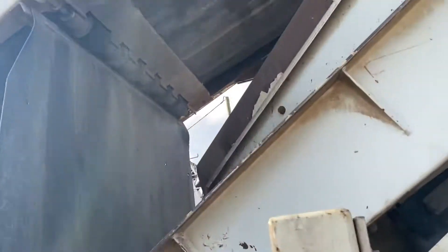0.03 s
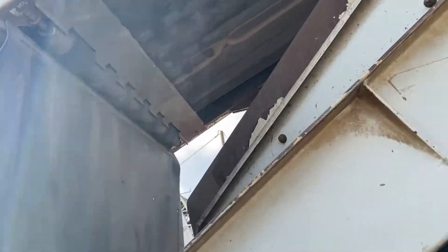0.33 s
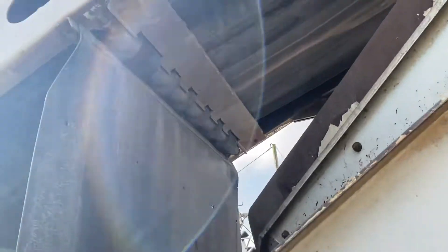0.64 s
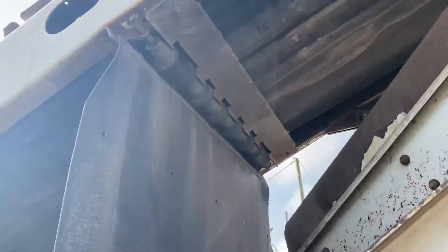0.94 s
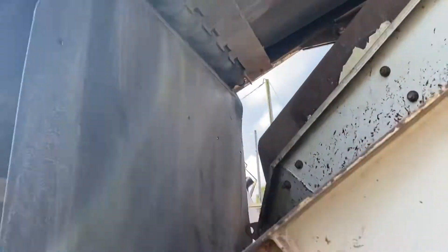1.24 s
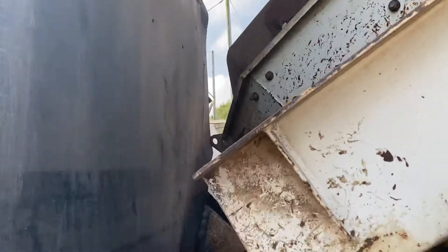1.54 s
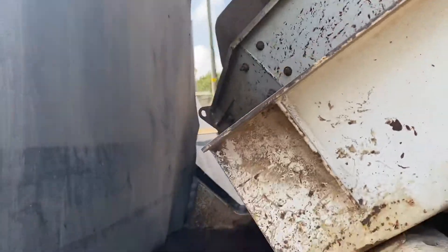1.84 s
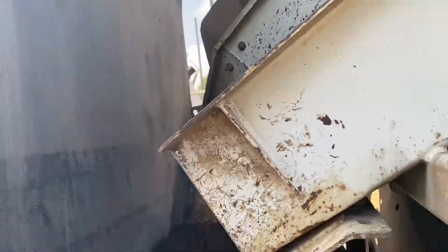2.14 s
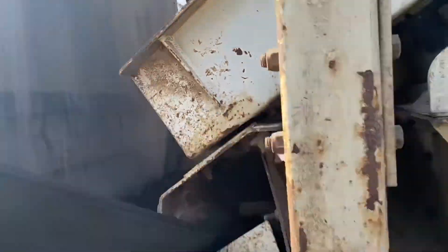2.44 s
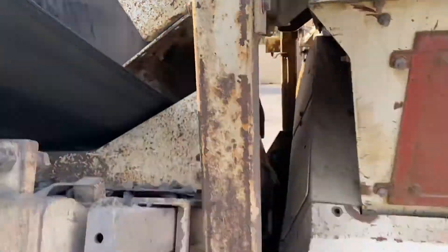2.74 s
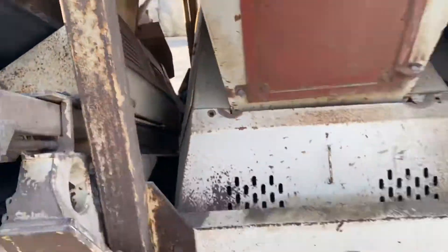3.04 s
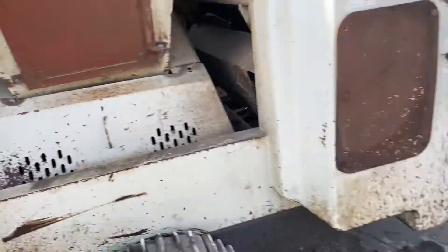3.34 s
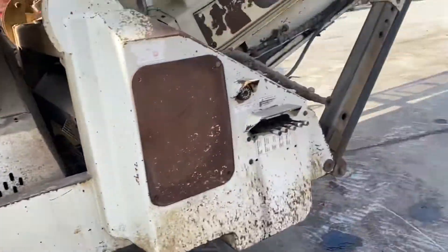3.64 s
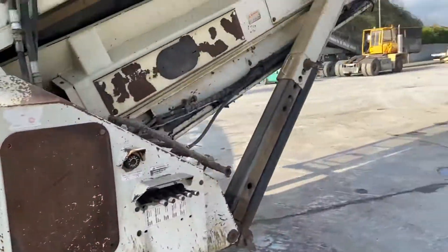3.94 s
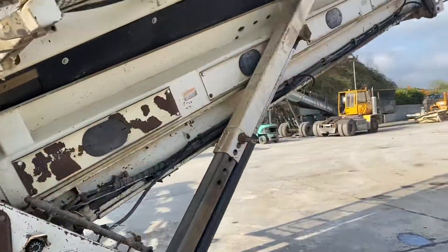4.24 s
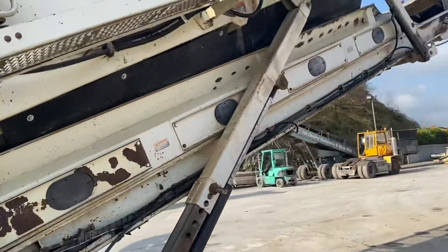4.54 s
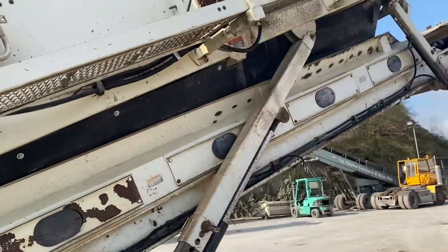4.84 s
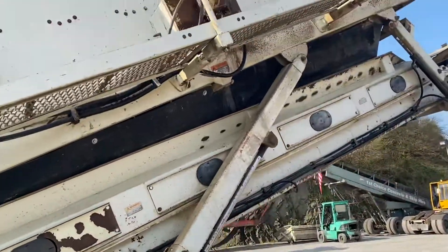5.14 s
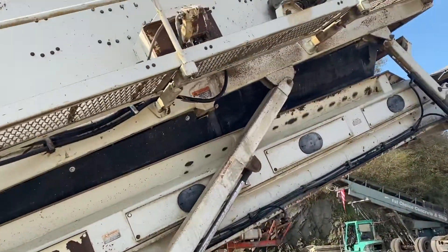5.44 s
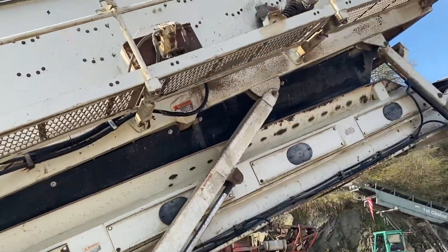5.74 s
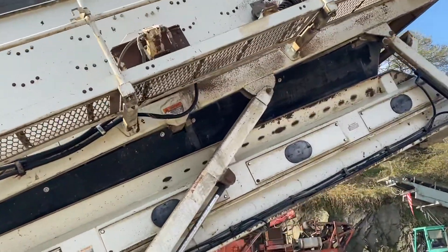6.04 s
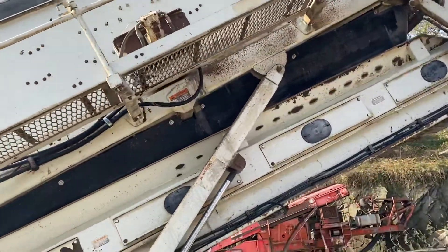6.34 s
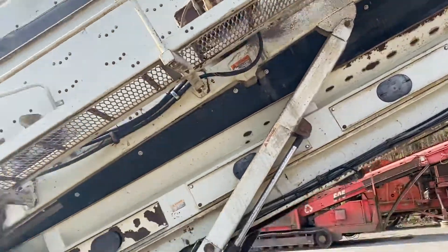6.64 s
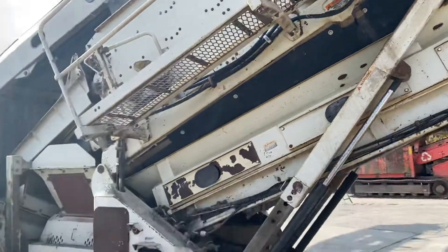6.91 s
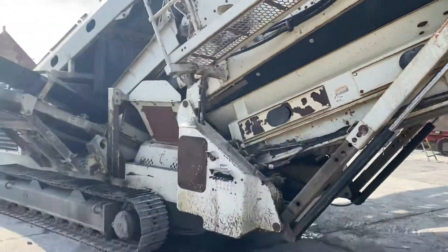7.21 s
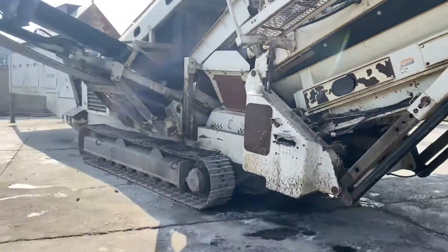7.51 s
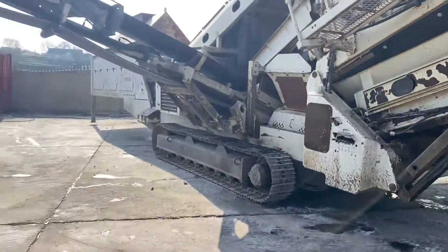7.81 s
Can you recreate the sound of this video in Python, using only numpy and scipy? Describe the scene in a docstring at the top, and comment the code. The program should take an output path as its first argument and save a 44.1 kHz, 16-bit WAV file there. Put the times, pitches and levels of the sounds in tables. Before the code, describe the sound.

A large diesel screening machine runs outdoors with a low rumble and roar, then softens as a fast metallic mesh rattle comes forward.

```python
"""Walking past a screening plant

A tracked machine that sifts stone runs in a concrete yard. Its diesel rumbles, roars and clatters,
a nine-piston hydraulic pump hums and whines, a shaking screen box throws its mesh against the frame
once a turn, and belts hiss over rollers. The listener walks away from the engine and along the side,
while bands of pitch briefly swell and fade. Two spaced microphones hear it all."""
import sys
import numpy as np
from scipy import signal
from scipy.fft import rfft, irfft, next_fast_len
from scipy.io import wavfile
from scipy.ndimage import uniform_filter1d, map_coordinates

SR = 44100
rng = np.random.default_rng(int(sys.argv[2]) if len(sys.argv) > 2 else 0)


def store_pcm(level_fs):
    """Save levels as 16-bit WAV."""
    pcm = np.round(np.clip(level_fs, -1, 1) * 32767).astype(np.int16)
    wavfile.write(sys.argv[1], SR, np.atleast_2d(pcm).T)


N = 355887
TIME_S = np.arange(N) / SR


def amp(db):
    """Turn decibels into a gain to multiply by."""
    return 10 ** (np.asarray(db) / 20)


def unit(x):
    """Scale a signal to an average strength (rms) of 1."""
    return x / np.sqrt(np.mean(x ** 2) + 1e-20)


def along(points, hz):
    """Read between (pitch_hz, value) points on a log pitch scale."""
    pitches, values = np.transpose(points)
    return np.interp(np.log(hz + 1), np.log(pitches + 1), values)


def curve(points, t=TIME_S):
    """Join (time_s, value) points with straight lines."""
    return np.interp(t, *np.transpose(points))


def swells(rows):
    """Add up bell-shaped rises and dips in dB."""
    return sum(db * np.exp(-((TIME_S - s) / half) ** 2) for s, half, db in rows)


def spots(table, multiple):
    """The rises and dips in dB that belong to one tone."""
    return swells((s, half, db) for s, half, k, db in table if round(k) == multiple)


def peak(hz, centre, width):
    """The gain of one resonance, 1 at its centre."""
    return 1 / (1 + (2 * (hz - centre) / width) ** 2)


def wobble(rate_hz):
    """A smooth random curve through rate_hz new values a second."""
    values = rng.standard_normal(int(N * rate_hz / SR) + 4)
    return map_coordinates(values, [TIME_S * rate_hz])


def filtered(x, response):
    """Scale each frequency in x by response(hz)."""
    size = next_fast_len(N + SR // 2)
    return irfft(rfft(x, size) * response(np.fft.rfftfreq(size, 1 / SR)), size)[..., :N]


# How alike noise is at the two microphones (1 is identical): pitch_hz, likeness
LIKENESS = [(70, .95), (200, .84), (420, .68), (900, .62), (1500, .52), (1900, .35), (2600, .72),
            (3100, .66), (3600, .38), (4400, .76), (5700, .1), (6600, .88), (9000, .88)]
def noise(colour, patchy_db):
    """Stereo noise shaped by the gain colour(hz); echoes off steel panels shift it in random patches."""
    spectrum = signal.stft(rng.standard_normal((2, N)), nperseg=2048)[2]
    patches = uniform_filter1d(rng.standard_normal(spectrum.shape[1:]), size=4, axis=0, mode="wrap")
    patches = uniform_filter1d(patches, size=14, axis=1, mode="wrap")
    pair = signal.istft(spectrum * amp(patchy_db * unit(patches)), nperseg=2048)[1][:, :N]
    spread = lambda hz: np.arccos(np.clip(along(LIKENESS, hz), 0, .995)) / 2
    mid = filtered(pair[0], lambda hz: colour(hz) * np.cos(spread(hz)))
    side = filtered(pair[1], lambda hz: colour(hz) * np.sin(spread(hz)))
    return unit(np.array([mid + side, mid - side]))


def band(spectrum, patchy_db):
    """Stereo noise shaped by (pitch_hz, level_db) points."""
    return noise(lambda hz: amp(along(spectrum, hz)), patchy_db)


def tone(turns, multiple, waver, flutter_hz=9):
    """A tone at a multiple of a turning rate; shifting echoes make it waver at each microphone."""
    shared = wobble(flutter_hz) + 1j * wobble(flutter_hz)
    separate = np.array([wobble(5) + 1j * wobble(5) for _ in range(2)])
    steady = np.exp(2j * np.pi * (multiple * turns + rng.random()))
    return unit(np.real((1 + waver * (shared + .5 * separate)) * steady))


def tones(turns, table, waver):
    """Add up a table of (multiple, level_db) tones."""
    return sum(amp(db) * tone(turns, multiple, waver) for multiple, db in table)


# How openly the engine bay is heard; the chassis hides it most near 4 s: time_s, level_db
ENGINE_BAY = [(0, -29), (1.1, -33), (1.9, -33), (2.7, -36.5), (3.5, -41.5), (4.15, -45.5), (4.7, -43),
              (6.4, -42), (7.4, -42), (8.07, -39.5)]
def bay_fall_db():
    """How far the engine bay's sound has dropped below its loudest."""
    bay_db = curve(ENGINE_BAY)
    return bay_db - bay_db.max()


# Which way the listener is turned (0 side-on, 1 facing the machine): time_s, facing
FACING = [(0, 0), (5.6, 0), (6.6, 0.56), (8.07, 1)]
def walk_gain(near_db, fall_share, facing_db=0):
    """A sound follows a share of the bay's drop and changes by facing_db as the listener turns."""
    return amp(near_db + fall_share * bay_fall_db() + facing_db * curve(FACING))


def bass_gain():
    """Bass bends round the chassis, so it follows less than half of the bay's drop."""
    return walk_gain(near_db=-20.5, fall_share=0.45)


def throb(firings, depth):
    """A gain that swells at each firing; the swells blur with distance."""
    return 1 + depth * amp(bay_fall_db()) * np.cos(2 * np.pi * firings)


# The engine's higher tones, relative to its roar: firing_multiple, level_db
ENGINE_TONES = [(4, -14.5), (4.5, -17), (5, -13.5), (6, -23.5), (7.5, -19.5), (9, -13.5), (24, -28)]
# The colours of the block's rumble, the air's roar and the metal clatter: pitch_hz, level_db
RUMBLE_COLOUR = [(15, -29), (30, -21), (43, -10), (62, 2.5), (100, -1.5), (140, 1), (270, -0.5), (370, -2),
                 (440, -1), (520, -11), (700, -19.5), (1500, -66)]
ROAR_COLOUR = [(200, -17), (340, -4.5), (430, 1.5), (520, 1), (720, -1), (860, 0), (960, -3.5),
               (1280, -5.5), (1600, -25.5), (3000, -61)]
CLATTER_COLOUR = [(500, -43), (1000, -3.5), (1450, 3.5), (1800, 4), (2450, 0), (3000, -3.5), (4000, -6.5),
                  (4900, -8.5), (5800, -16.5), (7000, -16.5), (9000, -23), (12500, -23.5), (15700, -52)]
# Clatter swelling through gaps in the panels: middle_s, half_length_s, boost_db
CLATTER_SWELLS = [(.1, 0.18, 1), (2.55, 0.26, 0.5), (4.9, 0.64, 1)]
def engine(firings):
    """The diesel drones, its block rumbles and clatters at each firing, and the cooling air roars."""
    roar_gain = walk_gain(near_db=-20.5, fall_share=0.51, facing_db=-0.26)
    clatter_gain = walk_gain(near_db=-25, fall_share=0.55, facing_db=-0.3) * amp(swells(CLATTER_SWELLS))
    drone = roar_gain * tones(firings, ENGINE_TONES, waver=0.33)
    rumble = bass_gain() * band(RUMBLE_COLOUR, patchy_db=0.5) * throb(firings, depth=0.051)
    roar = roar_gain * band(ROAR_COLOUR, patchy_db=1.87)
    clatter = clatter_gain * band(CLATTER_COLOUR, patchy_db=2.0) * throb(firings, depth=0.13)
    return drone + rumble + roar + clatter


# The exhaust's low tones: firing_multiple, near_db, fall_share, facing_db, waver
EXHAUST_TONES = [(1, -19, 0.81, 2, 0.065), (2, -22, 0.81, 0.5, 0.2), (3, -27, 0.44, -2.5, 0.088)]
# Spots where a tone and its panel echo add or cancel: middle_s, half_length_s, multiple, change_db
EXHAUST_SPOTS = [(.3, 0.44, 1, -1.5), (1.9, 0.82, 1, 2.4), (2.95, .25, 1, -2.5), (3.6, 0.34, 1, -6),
                 (4.35, .2, 1, 3.5), (7.5, .4, 1, 1), (5.55, 0.26, 1, -11), (6.35, .35, 1, -2),
                 (0, 0.54, 2, -5.5), (1.7, 0.54, 2, 2), (2.72, 0.17, 2, -8), (3.7, 0.55, 2, 2),
                 (7.9, .3, 2, 2), (4.5, 0.14, 2, -19), (4.9, .15, 2, 3.5), (5.8, .15, 2, 4),
                 (5.45, 0.14, 2, -15), (6.35, 0.37, 2, -8), (7.1, .3, 2, -4.5), (1.65, 0.44, 3, 2),
                 (2.7, 0.23, 3, 4.5), (3.9, .3, 3, 1), (5.15, .2, 3, 2.5), (5.8, 0.34, 3, 3),
                 (6.17, .12, 3, -10), (7.15, 0.15, 3, -10)]
def exhaust(firings):
    """The exhaust hums at one, two and three times the firing rate, fading along the walk."""
    hum = 0
    for multiple, near_db, fall_share, facing_db, waver in EXHAUST_TONES:
        gain = walk_gain(near_db, fall_share, facing_db) * amp(spots(EXHAUST_SPOTS, multiple))
        hum += gain * tone(firings, multiple, waver)
    return hum


# The pump's higher tones, relative to the engine's rumble: shaft_multiple, level_db
PUMP_TONES = [(4, -18.5), (27, -20)]
# Loud and dead spots of the whine: middle_s, half_length_s, shaft_multiple, change_db
WHINE_SPOTS = [(1.72, 0.28, 9, 6.5), (3.1, 0.48, 9, 3), (4.5, 0.36, 9, -8.5), (6.4, 1, 9, 2),
               (.5, .45, 18, 9), (1.85, 0.73, 18, 6.5), (3.42, .24, 18, 11), (4.4, 0.27, 18, -9),
               (5.9, .35, 18, 5), (6.5, 0.15, 18, -12), (7.8, .5, 18, 2)]
def pump(shaft_hz=47.25):
    """The shaft hums; nine pistons a turn give a rough, fluttering whine."""
    turns = np.cumsum(shaft_hz + 0.092 * wobble(3)) / SR
    hum = amp(-11) * tone(turns, 1, waver=0.19) + tones(turns, PUMP_TONES, waver=1.0)
    whine = amp(-33.5 + spots(WHINE_SPOTS, 9)) * tone(turns, 9, waver=.5, flutter_hz=16)
    octave = amp(-39 + spots(WHINE_SPOTS, 18)) * tone(turns, 18, waver=.75, flutter_hz=26)
    return bass_gain() * hum + whine + octave


SCREEN_HZ = 16.46  # turns a second of the shaft that shakes the screen box
# The pitches at which the mesh rings: pitch_hz, width_hz, boost_db
MESH_NOTES = [(2570, 150, 8.1), (3170, 180, 4), (3500, 260, 2.3), (3920, 130, 4.8), (4270, 160, 3.5),
              (5200, 120, 8)]
def mesh_noise(spectrum, patchy_db):
    """Noise made metallic by the mesh's resonances."""
    boost_db = lambda hz: sum(db * peak(hz, centre, width) for centre, width, db in MESH_NOTES)
    return noise(lambda hz: amp(along(spectrum, hz) + boost_db(hz)), patchy_db)


# The colour of the loose mesh's rattle: pitch_hz, level_db
RATTLE_COLOUR = [(400, -10), (900, -15), (1300, 15.5), (2000, 8), (2800, -9), (3400, -9), (4400, -14),
                 (5400, -9), (7000, -14), (12000, -21), (15700, -38)]
def mesh_rattle(turns, rise_s=0.0085):
    """The loose mesh rattles in one uneven burst each turn."""
    rise = (turns % 1) / SCREEN_HZ / rise_s
    burst = rise * np.exp(-rise ** 1.52 / 2)
    roughness = amp(2.2 * wobble(16) + 1.5 * wobble(500))
    return unit(burst * roughness) * mesh_noise(RATTLE_COLOUR, patchy_db=1.7)


# Strikes with a set force, most of them extra hard: time_s, force_db
HARD_STRIKES = [(4.02, 3), (4.27, 3.5), (4.39, 3.5), (4.446, 6), (4.507, 5), (4.629, 5), (4.75, 2),
                (5.113, 6), (5.23, 4), (5.302, 4), (5.355, 1), (5.475, 2), (5.839, 4.5), (5.903, 3),
                (5.958, 1), (6.27, 2.5), (6.51, 1), (7.239, 2.5), (7.299, 2), (7.36, 0), (7.42, 2),
                (7.911, 4)]
def mesh_strikes(turns, scatter_db=1.2, delay_s=0.0029, rise_s=0.0011, rebound_s=0.0069):
    """The loudness shape of the mesh hitting its frame each turn: a blow, a rebound, a short ring."""
    turn = turns.astype(int)
    force_luck, rebound_luck = rng.standard_normal((turn[-1] + 1, 2)).T
    force_db = scatter_db * force_luck
    for s, db in HARD_STRIKES:
        force_db[int(s * SCREEN_HZ)] = db
    age_s = (turns % 1) / SCREEN_HZ - delay_s
    pulse = lambda t, decay_s: np.clip(t / rise_s, 0, 1) * np.exp(-np.abs(t) / decay_s)
    blow = pulse(age_s, decay_s=0.0039)
    rebound = amp(3) * pulse(age_s - rebound_s * (1 + 0.24 * rebound_luck[turn]), decay_s=0.0039)
    ring = amp(-1.5) * pulse(age_s, decay_s=0.022)
    return amp(force_db[turn]) * unit(np.sqrt(blow ** 2 + rebound ** 2 + ring ** 2))


# The colour of each strike's tick: pitch_hz, level_db
TICK_COLOUR = [(1500, -9), (2700, -5), (3300, -2), (4400, -5), (5300, -8), (6200, -15.5), (15000, -40)]
# The tones of the shaking box: shaft_multiple, level_db
BOX_TONES = [(2, -32), (5, -13), (7, -9.5)]
# How loud the chatter, the mesh's ring and the box's hum are along the walk: time_s, level_db
CHATTER_LEVEL = [(0, -42), (3.4, -49), (4.3, -42), (5.4, -37.5), (6.6, -39.5), (8.07, -41)]  # loudest once the listener has rounded the chassis
RING_LEVEL = [(0, -62), (4.4, -49.5), (5.9, -45), (6.5, -49), (7.3, -41.5), (7.7, -46.5), (8.07, -44.5)]  # clearest from in front
HUM_LEVEL = [(0, -32), (2.7, -20.5), (4.6, -36), (5.6, -25.5), (7.3, -25), (8.07, -34)]
def screen_box():
    """An off-centre shaft shakes the humming box and throws the mesh: bright ticks over a dull rattle."""
    turns = TIME_S * SCREEN_HZ
    rattle = mesh_rattle(turns)
    strikes = mesh_strikes(turns)
    ticks = amp(-5) * strikes * mesh_noise(TICK_COLOUR, patchy_db=2.0)
    ring_colour = lambda hz: peak(hz, centre=3330, width=830) ** 2
    ring = amp(curve(RING_LEVEL)) * strikes * noise(ring_colour, patchy_db=4.5)
    hum = amp(curve(HUM_LEVEL)) * tones(turns, BOX_TONES, waver=0.3)
    return amp(curve(CHATTER_LEVEL)) * (rattle + ticks) + ring + hum


# The colour of the belts' hiss: pitch_hz, level_db
HISS_COLOUR = [(2000, -28), (4500, 7), (6000, 5.5), (7200, -.5), (10000, -2), (11000, 5), (12000, -0.5),
               (13000, 3), (14400, -5.5), (15700, -5.5)]
# How the hiss falls and rises along the walk, before its boost: time_s, level_db
HISS_LEVEL = [(0, -43), (1.7, -42), (2.31, -43.5), (3.57, -55.5), (4.27, -59), (4.72, -57), (6.14, -56),
              (7.48, -51.5), (8.07, -52.5)]
def belts(boost_db=8.5):
    """Gritty rubber hisses over the rollers."""
    grit = amp(.9 * wobble(400) + .4 * wobble(25) + .25 * wobble(8))
    return amp(curve(HISS_LEVEL) + boost_db) * unit(grit * band(HISS_COLOUR, patchy_db=1))


# The middle of a sliding, slightly louder band of metallic rasp: time_s, pitch_hz
RASP_PITCH = [(0, 2460), (.9, 2430), (1.5, 2070), (2.6, 2330), (3.3, 2270), (4.5, 2550), (5.2, 2350),
              (6.6, 2640), (8.07, 2650)]
# Pitch bands that briefly swell or fade in the machine's sound during the walk:
# middle_s, half_length_s, pitch_hz, width_hz, change_db
COLOUR_SWELLS = [(0.052, 0.17, 1400, 510, 1.5), (1.9, 0.58, 425, 60, 3), (1.65, 0.66, 3800, 1700, 3),
                 (1.77, .35, 1400, 600, 3), (2.43, .25, 1780, 420, 3), (2.9, 0.28, 294, 46, 2.5),
                 (0.66, 0.61, 3300, 300, 3.5), (2.6, .45, 3400, 400, 2), (0.84, .35, 356, 45, 5),
                 (2.1, 0.33, 830, 100, 1), (3.6, .45, 540, 55, 1.5), (5.2, .9, 770, 85, 5),
                 (3.44, 0.23, 790, 110, 4), (4.1, .34, 1820, 200, 2.5), (4.66, .25, 350, 60, 3),
                 (5, 0.32, 470, 160, 1), (4.9, 0.34, 2150, 170, 4), (6, 0.42, 1780, 130, 2),
                 (8.1, .8, 1650, 360, 2), (5.8, .49, 3200, 170, 2), (6.1, 0.51, 694, 54, -4.5),
                 (6.3, 0.54, 1020, 180, -3.5), (2.65, .5, 2200, 400, 0.5), (1.24, .2, 1950, 250, 2),
                 (7.1, .4, 1020, 200, 2.5), (7.04, .7, 290, 54, 4.5), (7.86, 0.45, 490, 100, -5.5),
                 (7.74, 0.37, 870, 200, -3), (1.3, 0.23, 2600, 350, -0.5), (0.68, 0.46, 464, 70, -3)]
def shift_colour(sound, rasp_db=1.5, rasp_width_hz=500):
    """A band of rasp slides up and down while other pitch bands briefly swell or fade."""
    hz, t, spectrum = signal.stft(sound, SR, nperseg=4096)
    hz = hz[:, None]
    change_db = rasp_db * peak(hz, curve(RASP_PITCH, t), rasp_width_hz)
    for s, half, centre, width, db in COLOUR_SWELLS:
        change_db += db * peak(hz, centre, width) * np.exp(-((t - s) / half) ** 2)
    return signal.istft(spectrum * amp(change_db), SR, nperseg=4096)[1][:, :N]


# How far the left microphone's wave runs ahead of the right's: pitch_hz, side_on_rad, facing_rad
LEFT_LEAD = [(0, 0, 0), (130, .4, .1), (400, 1.1, .7), (800, 1.8, 1.1), (1550, 2.7, 1.8), (2000, 4.2, 5.3),
             (2450, 6.5, 6.7), (3500, 7.5, 6.8), (4000, 6.1, 6.2), (5200, 7.1, 6.5), (6200, 6.2, 6.2),
             (7400, 6.2, 6.2), (9000, 3.14, 3.14), (15000, -6.2, -6.2)]
# How much louder the left microphone is: pitch_hz, left_minus_right_db
LEFT_LOUDER = [(60, -3.5), (110, 3.5), (200, 0), (380, 2.5), (700, 5), (1290, -0.5), (2380, -0.5),
               (4400, 2), (8120, -0.5), (15000, 1)]
def microphones(sound):
    """Sound reaches the two microphones at different times and levels; turning shifts the timing."""
    hz, t, spectrum = signal.stft(sound, SR, nperseg=2048)
    pitches, side_on, head_on = np.transpose(LEFT_LEAD)
    facing = curve(FACING, t)
    lead = np.outer(np.interp(hz, pitches, side_on), 1 - facing)
    lead += np.outer(np.interp(hz, pitches, head_on), facing)
    left = amp(along(LEFT_LOUDER, hz) / 2)[:, None] * np.exp(1j * lead / 2)
    return signal.istft(spectrum * np.array([left, 1 / left]), SR, nperseg=2048)[1][:, :N]


FIRING_HZ, LEAVE_S, WALK_M_PER_S, SOUND_M_PER_S = 75.02, 2.41, 1.15, 343
def scene():
    """All parts of the machine run at once, heard along the walk."""
    # walking away lowers the engine's pitch a little
    doppler = 1 - (TIME_S > LEAVE_S) * WALK_M_PER_S / SOUND_M_PER_S
    firings = np.cumsum(FIRING_HZ * doppler + 0.072 * wobble(4)) / SR
    machine = engine(firings) + exhaust(firings) + pump() + screen_box() + belts()
    return microphones(shift_colour(machine))


def record(dry, top_hz=15800):
    """Cut away the very highest treble."""
    return filtered(dry, lambda hz: hz < top_hz)


dry = scene()
out = record(dry)
store_pcm(out)
```